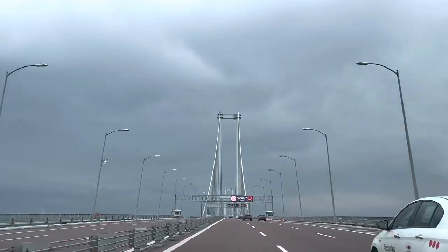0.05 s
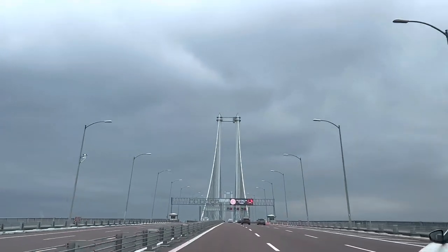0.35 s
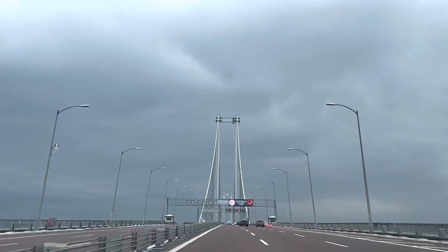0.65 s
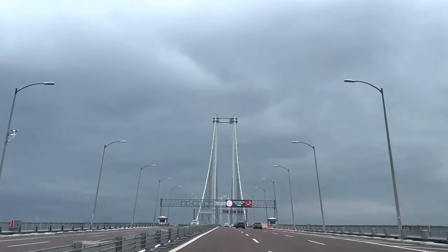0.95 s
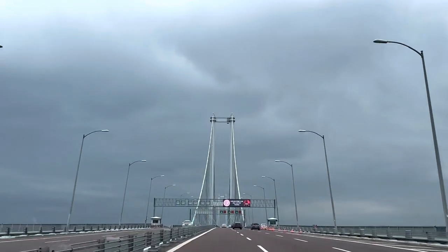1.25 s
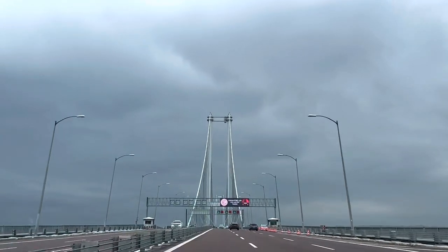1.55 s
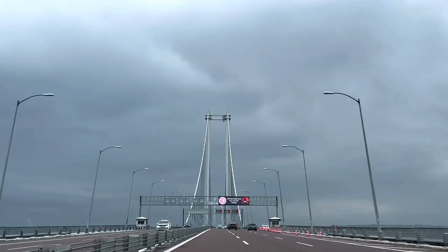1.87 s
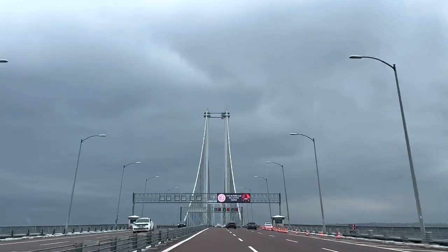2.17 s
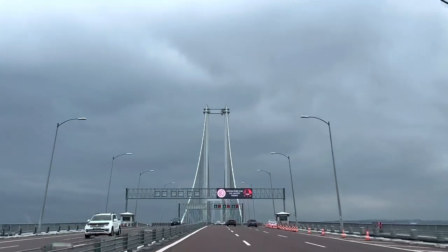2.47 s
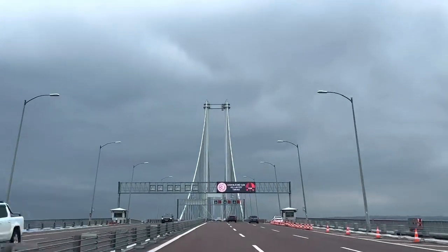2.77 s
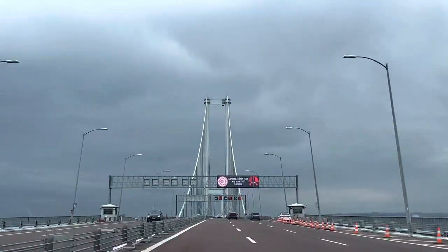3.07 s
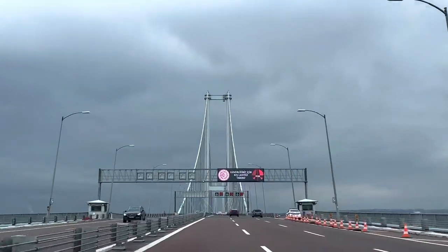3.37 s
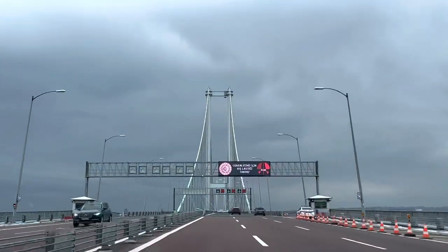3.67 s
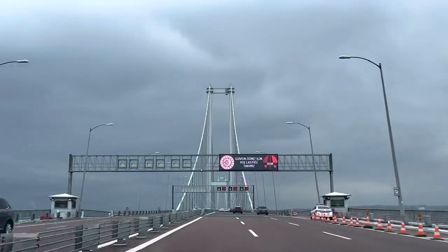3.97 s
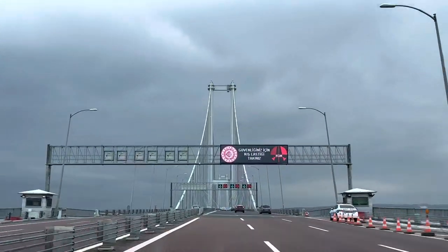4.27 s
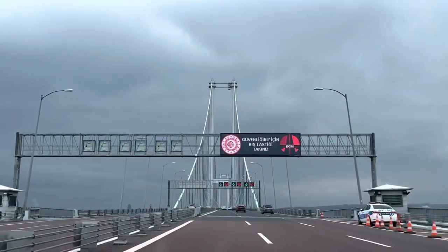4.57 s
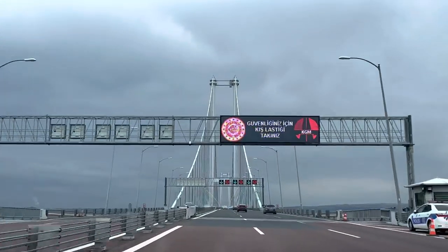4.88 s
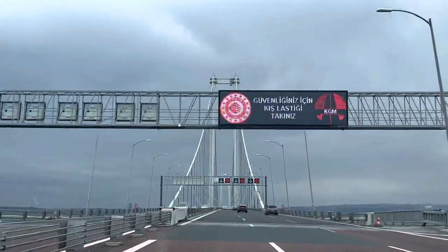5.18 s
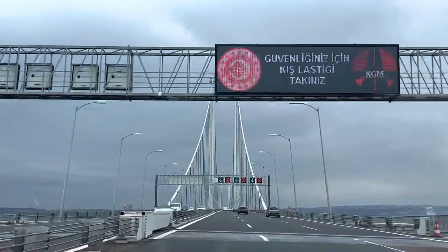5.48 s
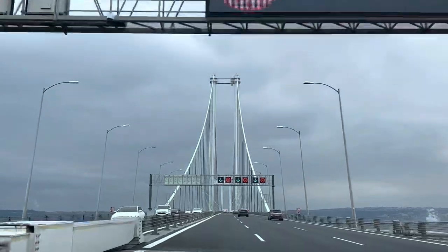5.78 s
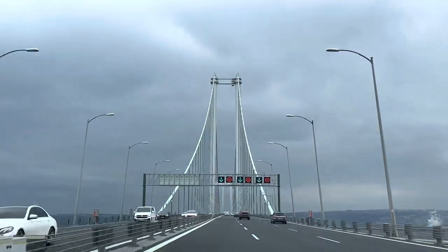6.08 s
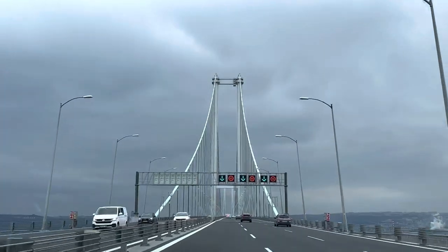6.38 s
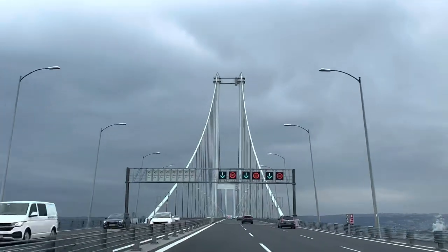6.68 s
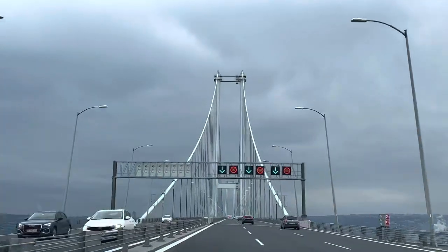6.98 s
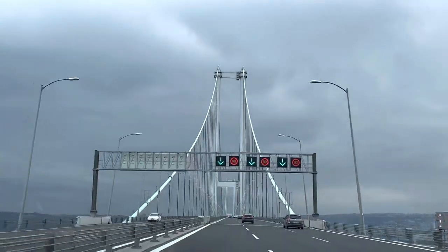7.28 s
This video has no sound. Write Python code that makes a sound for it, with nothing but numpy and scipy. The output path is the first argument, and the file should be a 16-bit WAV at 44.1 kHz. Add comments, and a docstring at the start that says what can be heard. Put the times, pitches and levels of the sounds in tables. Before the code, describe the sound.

Inside a car driving fast over a bridge, tyres make a steady low rumble under a slowly rising engine drone and a soft wind hiss. Loose plastic trim ticks faintly, and small bumps in the road make the cabin boom. Near the end the engine shifts up to a lower note, the wheels drum quickly over an expansion joint, and the driving noise carries on.

```python
"""Inside a car driving fast onto a suspension bridge. From the start, tyres boom and roar through the body,
wind hisses on the glass and the engine pulls slowly higher, while loose trim ticks faintly.
From about two seconds in, bumps in the deck make the cabin air boom. Near six seconds the engine
shifts up; just after, the wheels drum over the ribs of an expansion joint, and the car labours on."""
import sys
import numpy as np
from scipy import signal
from scipy.fft import rfft, irfft
from scipy.io import wavfile
from scipy.ndimage import uniform_filter1d

SR = 44100
rng = np.random.default_rng(int(sys.argv[2]) if len(sys.argv) > 2 else 0)


def persist_wave(psi):
    """Save psi, clipped to +-1, as 16-bit WAV."""
    counts = np.round(np.clip(psi, -1, 1) * 32767).astype(np.int16)
    wavfile.write(sys.argv[1], SR, np.atleast_2d(counts).T)


N = 332514
TIME = np.arange(N) / SR
FREQ = np.fft.rfftfreq(N, 1 / SR)


def gain_of(db):
    """Decibels to amplitude."""
    return 10 ** (np.asarray(db) / 20)


def unit_rms(x):
    """Scales to rms 1."""
    return x / np.sqrt(np.mean(x ** 2) + 1e-20)


def lookup(table, hz, column=1):
    """One column of a spectrum table, on a log-frequency axis."""
    columns = np.transpose(table)
    return np.interp(np.log(hz + 1), np.log(columns[0] + 1), columns[column])


def curve(rows):
    """An automation curve at every sample."""
    return np.interp(TIME, *np.transpose(rows))


def add(mix, start_s, sound):
    """Mixes a sound in at its start time."""
    part = mix[:, round(start_s * SR):][:, :sound.shape[-1]]
    part += sound[..., :part.shape[1]]


def wander(rate_hz, size=2048):
    """Slow random modulation of rms 1."""
    hz = np.fft.rfftfreq(size, TIME[-1] / size)
    slow = irfft(rfft(rng.standard_normal(size)) * np.exp(-(hz / rate_hz) ** 2) * (hz > 0), size)
    return np.interp(TIME, np.linspace(0, TIME[-1], size), unit_rms(slow))


def boost(resonances, hz):
    """Decibels that a set of resonances adds at a frequency."""
    return sum(db / (1 + (2 * (hz - centre) / width) ** 2) for centre, width, db in resonances)


def bandpass(order, low_hz, high_hz):
    """A Butterworth band-pass filter."""
    return signal.butter(order, [low_hz, high_hz], "bandpass", fs=SR, output="sos")


# stereo image of the cabin: freq_hz, coherence, left_lead_rad, left_over_right_db
STEREO_IMAGE = [(51, 1, 0, .2), (115, 0.96, 0, -.5), (180, 0.94, -0.5, 2), (316, .72, 0.48, -0.5),
                (437, 0.55, 0.7, 1.4), (700, 0.85, 1.67, 2.5), (974, 0.11, -0.5, 1.5),
                (1320, 0.33, -3, 1.5), (1720, .45, -1.5, 1), (2060, .8, 0.37, 0.5), (3300, .76, 0.84, 2),
                (5500, 0.3, -0.2, 3), (8500, 0.85, -0.5, 0)]

def cabin_noise(density_db):
    """Shaped stereo noise: nearly mono in the bass, wider higher up."""
    common, separate = rfft(rng.standard_normal((2, N)))
    coherence = np.clip(lookup(STEREO_IMAGE, FREQ), 0, 1)
    lead = lookup(STEREO_IMAGE, FREQ, column=2)
    pan = gain_of(lookup(STEREO_IMAGE, FREQ, column=3) / 2)
    right = (coherence * common + np.sqrt(1 - coherence ** 2) * separate) * np.exp(-1j * lead)
    return irfft(np.array([common * pan, right / pan]) * gain_of(density_db) * np.sqrt(SR / 2), N)


# tone of the tyres through the body: freq_hz, density_db
TYRE_SPECTRUM = [(12, -71), (23, -57), (35, -41), (52, -38.5), (65, -42.5), (120, -41.5), (142, -45),
                 (172, -41.5), (230, -49), (280, -50.5), (400, -54), (550, -60.5), (850, -68), (1200, -74),
                 (2200, -96), (4000, -125)]
# resonances of cabin air, tyre cavities and panels: centre_hz, width_hz, boost_db
CABIN_RESONANCES = [(78.4, 25, 8.5), (112.4, 29, 6), (212.9, 8.5, 6.5), (624, 74, 4), (940, 73, 4)]
# how hard the road shakes the car: time_s, level_db
ROAD_SHAKE = [(0.0, -14), (1.75, -19.5), (2.15, -17), (2.75, -14.5), (3.0, -17), (3.42, -20), (3.6, -17),
              (3.9, -18), (4.3, -15), (4.5, -16), (4.8, -12.5), (5.05, -16.5), (5.3, -12.5), (5.55, -19),
              (6.25, -15), (6.5, -20.5), (7.54, -18.5)]
# roar riding on the coarseness of the asphalt: time_s, gain_db
ASPHALT_ROAR = [(0.0, 0), (0.8, -0.9), (1.3, 0.7), (2.1, 0.1), (2.9, 1.0), (3.5, 0.5), (4.0, -1),
                (5.5, -0.35), (6.6, 1), (7.0, -0.7), (7.54, -0.1)]

def tyres(smooth_s=0.18, drum_follow=0.29, usual_shake_db=-15):
    """The boom follows the road's shake, the floor's drumming partly so, and the roar the asphalt."""
    noise = cabin_noise(lookup(TYRE_SPECTRUM, FREQ) + boost(CABIN_RESONANCES, FREQ))
    boom = signal.sosfiltfilt(bandpass(4, 60, 108), noise)
    drum = signal.sosfiltfilt(bandpass(4, 135, 205), noise)
    roar = noise - boom - drum
    window = int(smooth_s * SR)
    boom_rms = np.sqrt(uniform_filter1d(uniform_filter1d((boom ** 2).mean(0), window), window // 2))
    shake_db = curve(ROAD_SHAKE)
    return (boom / boom_rms * gain_of(shake_db)
            + drum * gain_of(drum_follow * (shake_db - usual_shake_db))
            + roar * gain_of(curve(ASPHALT_ROAR)))


# hiss on the glass: freq_hz, density_db
WIND_SPECTRUM = [(500, -98), (1200, -77), (1550, -75), (1820, -82.5), (2050, -83.5), (2300, -89),
                 (3300, -93), (4000, -97.5), (5500, -101), (7000, -105), (9000, -116), (11000, -134),
                 (15000, -140)]
# swells of the wind: time_s, gain_db
GUSTS = [(0.0, 0), (2.0, 0.0), (2.75, 1), (2.92, 3.5), (3.15, 1), (4.4, -1.0), (5.15, 0), (5.6, -0.5),
         (6.05, 1), (6.17, 1), (6.65, -2.5), (7.1, 0), (7.54, -1)]

def wind(flutter_db=0.8, flutter_hz=14):
    """Air rushes over the windscreen, swelling slowly and fluttering a little."""
    hiss = cabin_noise(lookup(WIND_SPECTRUM, FREQ))
    return hiss * gain_of(curve(GUSTS) + flutter_db * wander(flutter_hz))


# engine speed, a long pull and then the upshift: time_s, firing_hz
FIRING_RATE = [(0, 116), (1.2, 118.2), (2.2, 119.8), (2.8, 120.7), (5.2, 124.7), (5.76, 125.5), (6.03, 104),
               (6.6, 104.3), (7.1, 103.6), (7.55, 103.9)]
# engine partials: firing_multiple, level_db, labour_change_db, left_over_right_db, left_lead_rad
ENGINE_ORDERS = [(1, -20, -.7, 1, -.1), (1.25, -44, 6.5, 1, 0), (1.5, -37, -11, -1.5, .1),
                 (1.75, -45, 6, 1, 0), (2, -40.1, -9, 8, -.1), (2.25, -50, -8, 2, 0),
                 (2.5, -49.7, 2, 5, .2), (2.75, -52, -4, -1.5, -.2), (3, -49, -1, 0, .7),
                 (3.25, -47.5, -4, 5, .2), (3.5, -49.5, 6.5, 2.5, .2), (3.75, -50, -8, -.5, .3),
                 (4, -48.3, 10, -2, -.7), (4.25, -53, -7, 1, .3), (4.5, -55, -5, 1, .5),
                 (5, -50.5, 4, -3, -.1), (5.25, -59, 0, 2, .6), (5.5, -60, 2, 2, .6),
                 (5.75, -55.5, 0, 4.5, .7), (6, -59.5, .5, 4, .8), (6.25, -54.5, -8, 3, .8),
                 (6.5, -58.5, -3, 3, .8), (6.75, -60, -3, 2, .5), (7, -57.5, 0, 2, .5),
                 (7.25, -60, -2, 2, 0), (8, -58, -3, 1, 0)]
# body resonances that colour the engine: centre_hz, width_hz, boost_db
BODY_RESONANCES = [(156, 14, 12), (214, 16, 9), (236, 22.7, 16.5), (296.7, 22, 13), (319, 10, 11),
                   (372, 26, 13.5), (439, 15, 9.5), (479, 26, 13), (626, 24, 8), (694, 58, 10.3)]

def engine(shift_dip_db=-4.5, shift_fall_hz_per_s=110, labour_hz=(104, 116), waver_db=.4, jitter=.0004):
    """Orders sweep the body's resonances, dip in the upshift and change balance in the taller gear."""
    firing_hz = curve(FIRING_RATE)
    fall = -np.gradient(firing_hz, TIME) / shift_fall_hz_per_s
    unloaded = uniform_filter1d(np.clip(fall, 0, 1), size=SR // 10)
    labour = np.interp(firing_hz, labour_hz, [1, 0])  # full at low revs
    firings = np.cumsum(firing_hz * (1 + jitter * wander(6.4))) / SR
    out = np.zeros((2, N))
    for multiple, db, labour_db, side_db, lead in ENGINE_ORDERS:
        angle = 2 * np.pi * (multiple * firings + rng.random())
        load_db = shift_dip_db * unloaded + labour * labour_db
        body_db = boost(BODY_RESONANCES, multiple * firing_hz)
        level = np.sqrt(2) * gain_of(db + body_db + load_db + waver_db * wander(1.6))
        pan = unit_rms(gain_of([side_db / 2, -side_db / 2]))
        out += level * pan[:, None] * np.sin([angle, angle - lead])
    return out


# ticks of loose trim: start_s, level_db, chatter_t60_s, focus_hz
TRIM_TICKS = [(0.169, -50, .09, 6500), (0.3137, -53, .084, 6530), (0.4888, -54, .04, 6950),
              (0.615, -51, .03, 7500), (0.753, -49.5, .07, 6000), (2.185, -52, .05, 7500),
              (2.8674, -50, .12, 6940), (2.9287, -50.5, .31, 7440), (3.8344, -49, .1, 6300),
              (5.905, -47.5, .072, 5000), (6.1795, -46, .03, 4200), (6.1995, -40, .025, 6200),
              (6.2228, -48.5, .14, 7000), (6.3646, -51, .11, 7550), (6.3919, -54, .12, 7500),
              (6.4244, -54, .1, 7500)]
# ring of the plastic: pitch_hz, level_db, t60_s
TRIM_MODES = [(2900, -4, .005), (4200, -3, .006), (4950, -2, .006), (6450, -1, .006), (7200, -4, .005),
              (7700, -7, .005), (9100, -12, .005)]

def loose_trim(gain_db=1, rise_s=.0018, grit_db=22, spread=.3, density=.2, focus_db_per_octave=10):
    """Each tick is a gritty chatter that rings a plastic panel, favouring the modes near its focus."""
    t = np.arange(SR // 5) / SR
    plastic = bandpass(2, 1500, 9000)  # soft plastic carries no bass and little top
    out = np.zeros((2, N))
    for start_s, db, chatter_t60, focus_hz in TRIM_TICKS:
        ring = np.zeros(len(t))
        for hz, mode_db, t60 in TRIM_MODES:
            struck_db = mode_db - focus_db_per_octave * abs(np.log2(hz / focus_hz))
            ring += gain_of(struck_db - 60 * t / t60) * np.sin(2 * np.pi * hz * t)
        knocks = rng.standard_normal(len(t)) + spread * rng.standard_normal((2, len(t)))
        envelope = (1 - np.exp(-t / rise_s)) * gain_of(-60 * t / chatter_t60)
        chatter = knocks * envelope * (rng.random(len(t)) < density)
        rung = signal.fftconvolve(chatter, ring[None], axes=1)[:, :len(t)]
        tick = signal.sosfilt(plastic, rung + gain_of(grit_db) * chatter)
        add(out, start_s, gain_of(db + gain_db) * tick / abs(tick).max())
    return out


# bumps in the deck: start_s, level_db
DECK_BUMPS = [(1.936, -8), (2.225, -9), (2.321, -7.5), (2.567, -4.5), (2.66, -4.5), (2.769, -4.5),
              (2.83, -8), (3.061, -7.5), (4.058, -6), (4.134, -6.5), (4.263, -6), (4.708, -7), (5.108, -7),
              (6.835, -10), (7.052, -9.5)]

def deck_bumps(boom_hz=84, swell_s=0.021):
    """A bump heaves the body, and the cabin air booms for a few cycles."""
    t = np.arange(SR // 4) / SR
    swell = (t / swell_s * np.exp(1 - t / swell_s)) ** 2
    out = np.zeros((2, N))
    for start_s, db in DECK_BUMPS:
        add(out, start_s, gain_of(db) * swell * np.sin(2 * np.pi * (boom_hz * t + rng.random())))
    return out


# wheels hitting the ribs: start_s, slap_db, panel_db, body_db, focus_hz
RIB_HITS = [(6.115, -16.5, -16, -18, 570), (6.136, -15, -14, -17, 490), (6.156, -16.5, -17, -12.5, 760),
            (6.176, -18, -16.5, -13, 700), (6.221, -17, -13.5, -12, 560), (6.257, -22.5, -16, -12, 460),
            (6.2845, -33, -28, -13, 440), (6.312, -25.5, -16.5, -19, 780)]
# ring of the wheels, body and panels: pitch_hz, level_db, t60_s
THUD_MODES = [(104, -5, .2), (165, -5, .12), (247, 0, .16), (360, -9, .16), (435, -6, .13), (485, -1, .13),
              (600, -2, .16), (648, -4, .15), (700, -10, .14), (755, -8, .13), (822, -2, .15),
              (915, -9, .14), (1030, -15, .12)]
# tread slap through the floor: freq_hz, density_db
SLAP_SPECTRUM = [(150, -0.5), (300, 0), (400, 1), (480, 7), (545, 0), (640, 3.5), (700, -4), (760, -2.5),
                 (870, -2), (1080, -10), (1300, -35.5), (1900, -29), (2500, -35), (6000, -59),
                 (12000, -93.5)]

def expansion_joint(side_db=1., right_delay_s=0.00033):
    """Each rib slaps the tread, rings body and panels its own way and pumps the air inside the tyres."""
    slap_rise_s, slap_t60_s = .0012, .14
    thud_rise_s, panels_above_hz, focus_db_per_octave = .0028, 400, 9
    cavity_hz, cavity_db, cavity_t60_s = 212, 6.5, .21
    t = np.arange(SR // 2) / SR
    stereo_t = t - np.array([[0], [right_delay_s]])
    slap_attack = (1 - np.exp(-t / slap_rise_s)) ** 2
    thud_attack = (1 - np.exp(-t / thud_rise_s)) ** 2
    slap_power, cavity_power, thuds = np.zeros((1, N)), np.zeros((1, N)), np.zeros((2, N))
    for start_s, slap_db, panel_db, body_db, focus_hz in RIB_HITS:
        slap_envelope = slap_attack * gain_of(slap_db - 60 * t / slap_t60_s)
        cavity_envelope = thud_attack * gain_of(body_db + cavity_db - 60 * t / cavity_t60_s)
        add(slap_power, start_s, slap_envelope ** 2)
        add(cavity_power, start_s, cavity_envelope ** 2)
        for hz, db, t60 in THUD_MODES:
            focused_db = panel_db - focus_db_per_octave * abs(np.log2(hz / focus_hz))
            hit_db = focused_db if hz > panels_above_hz else body_db
            tone = np.sin(2 * np.pi * (hz * stereo_t + rng.random()))
            add(thuds, start_s, thud_attack * gain_of(hit_db + db - 60 * t / t60) * tone)
    slaps = unit_rms(cabin_noise(lookup(SLAP_SPECTRUM, FREQ))) * np.sqrt(slap_power)
    # the tyre cavity stores the energy of successive hits as one unbroken note
    cavity = np.sqrt(cavity_power) * np.sin(2 * np.pi * cavity_hz * (TIME - RIB_HITS[0][0]))
    return slaps + (thuds + cavity) * gain_of([[side_db], [-side_db]])


def scene():
    """The full cabin mix."""
    return tyres() + wind() + engine() + loose_trim() + deck_bumps() + expansion_joint()


def record(dry, whine_db=-61, whine_hz=9600, knee=.3, ceiling=.95, fade_s=.003, cutoff_hz=15700):
    """A faint high whine rides on the bass; then soft clipping, short end fades and a low-pass."""
    bass = signal.sosfilt(bandpass(2, 90, 260), dry.mean(0))
    mix = dry + gain_of(whine_db) * bass * np.sin(2 * np.pi * whine_hz * TIME)
    clean = np.clip(mix, -knee, knee)
    headroom = ceiling - knee
    rounded = clean + headroom * np.tanh((mix - clean) / headroom)
    fade = np.sin(np.pi / 2 * np.clip(np.minimum(TIME, TIME[-1] - TIME) / fade_s, 0, 1)) ** 2
    lowpass = signal.firwin(511, cutoff_hz, window=("kaiser", 9), fs=SR)
    return signal.oaconvolve(rounded * fade, lowpass[None], "same")


dry = scene()
out = record(dry)
persist_wave(out)
```